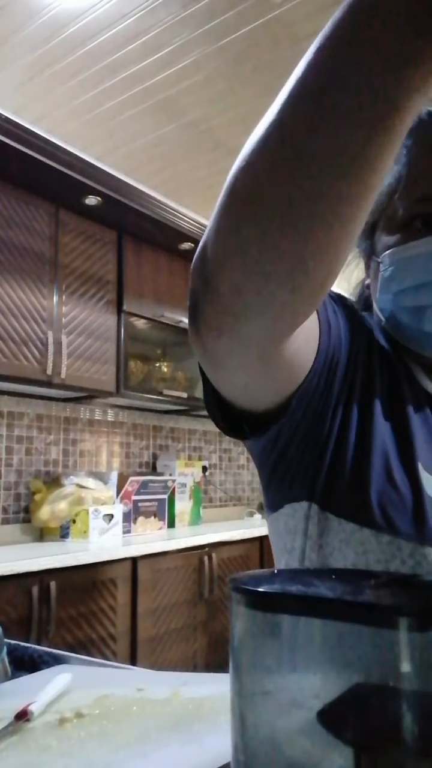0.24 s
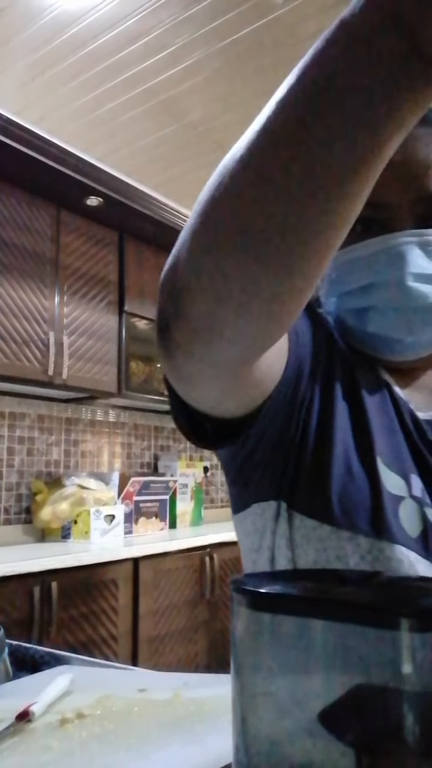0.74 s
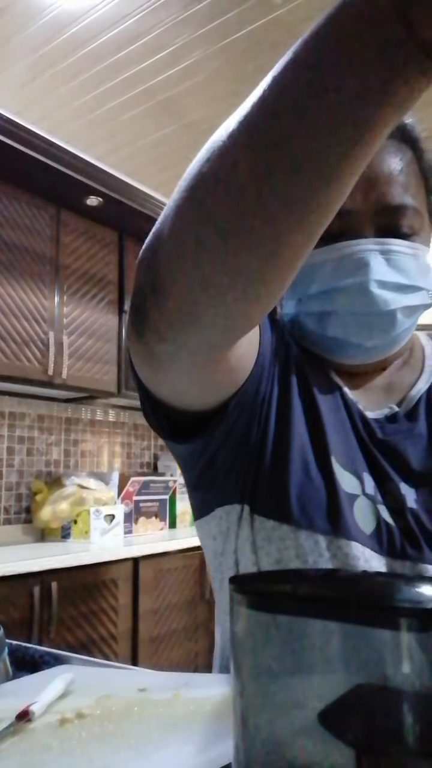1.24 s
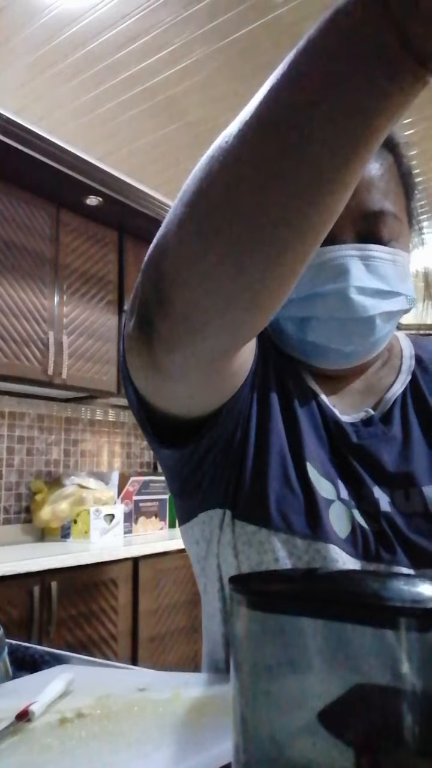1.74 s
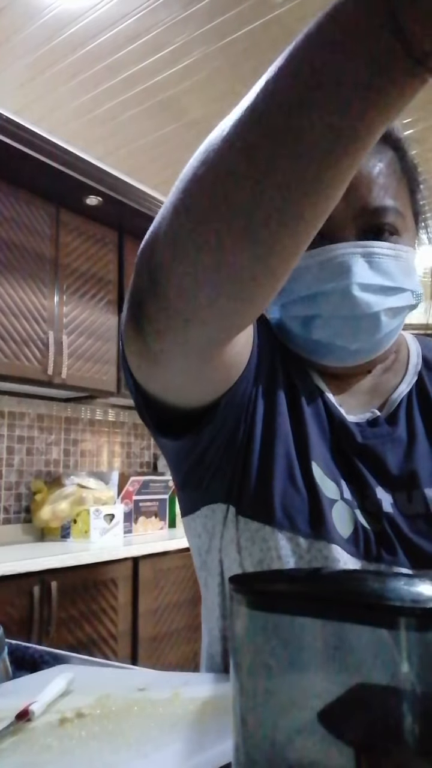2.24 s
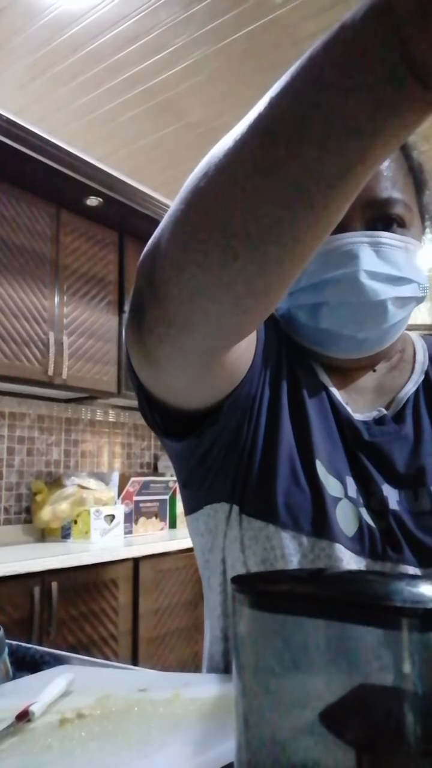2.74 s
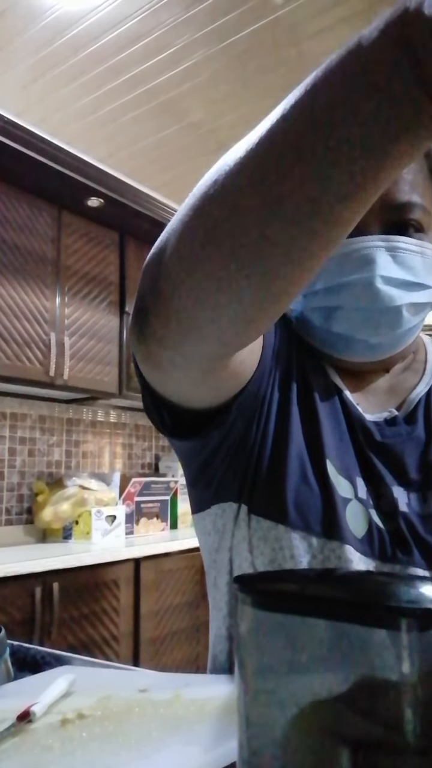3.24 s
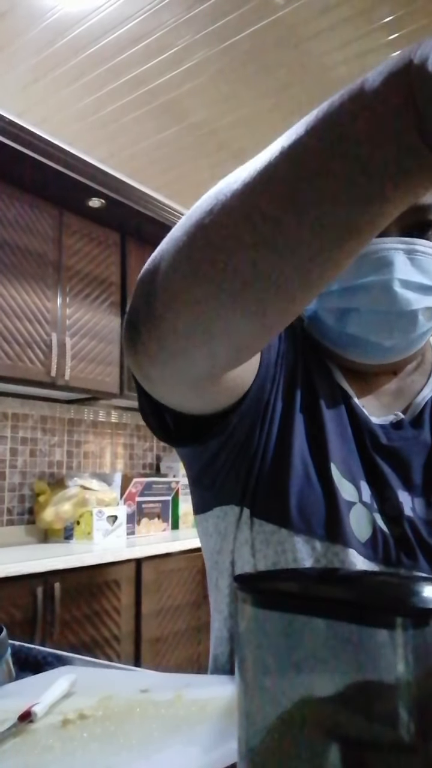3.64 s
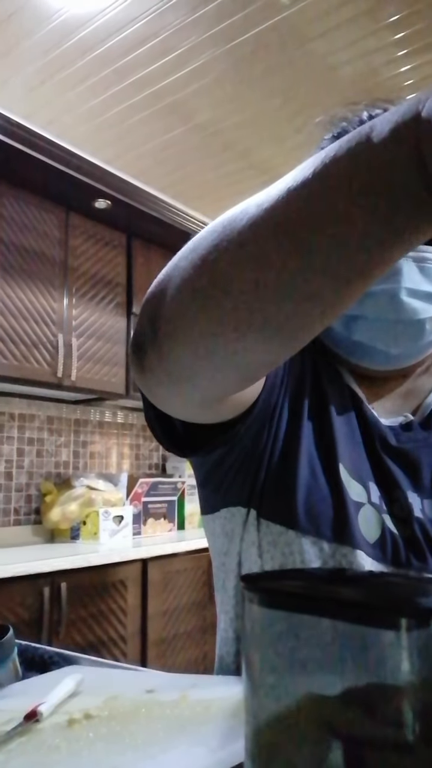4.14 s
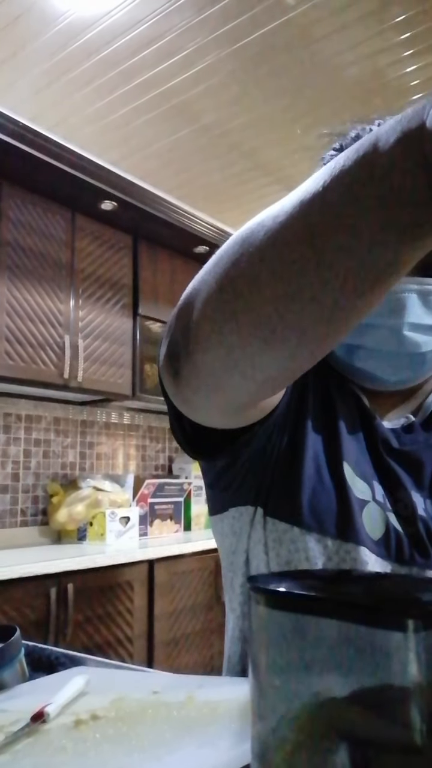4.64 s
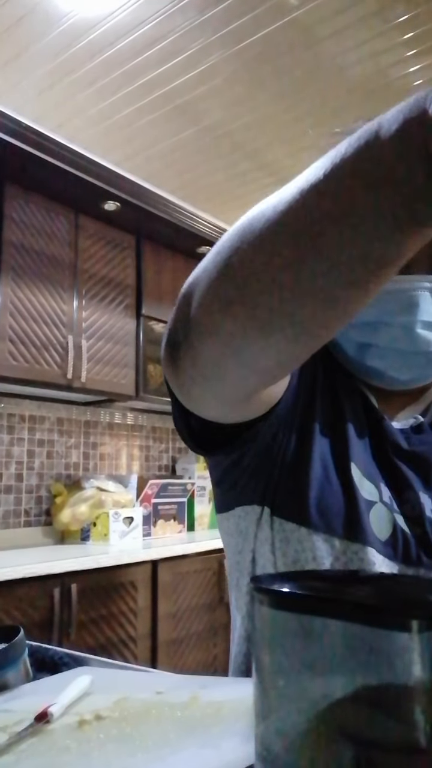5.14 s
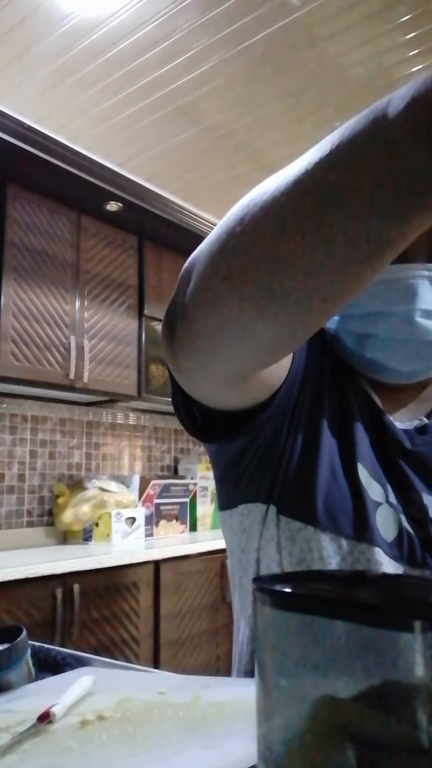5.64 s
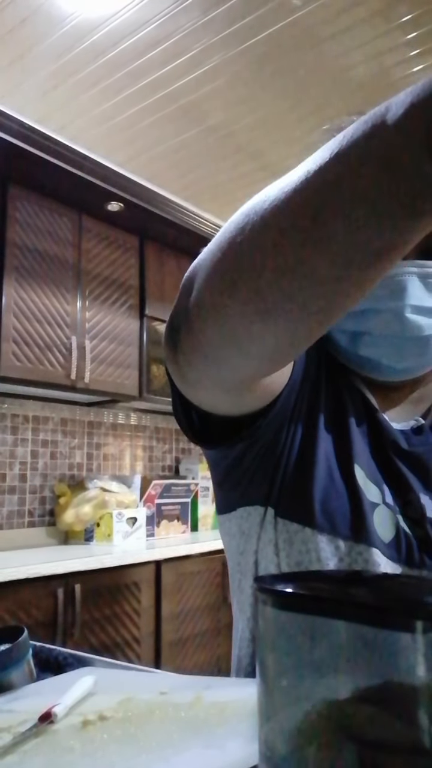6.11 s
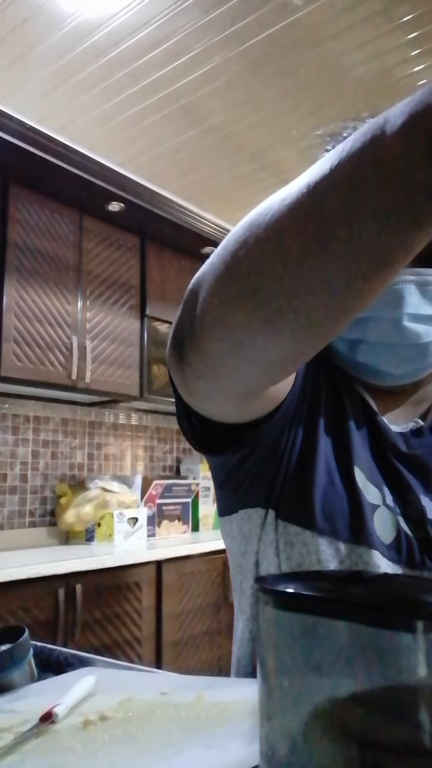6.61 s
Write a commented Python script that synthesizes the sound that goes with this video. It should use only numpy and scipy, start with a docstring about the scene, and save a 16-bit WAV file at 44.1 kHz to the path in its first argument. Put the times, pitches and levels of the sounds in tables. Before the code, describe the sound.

After a knock and plastic clicks, a juicer shreds produce in rough bursts, then spins freely with a climbing whine and rushing air.

```python
"""A kitchen hums. Plastic parts of an electric juicer click, and a knock rings its body.
The brushed mains motor starts, labouring and groaning while the disc shreds produce, lump by lump.
Then it runs free: the twelve-slot whine glides up through the housing's resonances
and settles over the rush of air from the emptied basket."""
import sys
import numpy as np
from scipy import signal
from scipy.fft import rfft, irfft, next_fast_len
from scipy.io import wavfile
from scipy.ndimage import map_coordinates

SR = 44100
rng = np.random.default_rng(int(sys.argv[2]) if len(sys.argv) > 2 else 0)


def dump_mix(stems):
    """Bounce the given channels to the path in sys.argv[1] as a 16-bit WAV at rate SR."""
    frames = np.atleast_2d(stems).T  # one column per channel
    limited = np.clip(frames, -1, 1)  # hard clip at full scale
    pcm = np.round(limited * 32767).astype(np.int16)
    wavfile.write(sys.argv[1], SR, pcm)


N = 302967
TIME_S = np.arange(N) / SR

# power shared by both ears (frequency [Hz], share [0-1])
COHERENCE = [(60, 0.87), (300, 1), (600, 0.99), (2000, 0.2), (6000, 0.067), (14000, 0.044)]

# kitchen background (time [s], noise level [dB], hum gain [dB])
ROOM_LEVELS = [(0, -45, 0.5), (0.8, -44.5, 0.5), (1.9, -45, 1.5), (1.96, -49, -4), (2.2, -45.5, 0),
               (2.36, -45.5, 0.5), (2.43, -50.5, -21), (4.2, -52, -11), (6.87, -71, -10.5)]
# hum tones (frequency [Hz], level [dB], wander [Hz])
ROOM_TONES = [(117.5, -59, 1.5), (118.8, -52.5, 3.35), (227.7, -44.5, 0.44), (414, -60, 3.8),
              (767, -55.5, 1.67)]
# room noise (frequency [Hz], relative density [dB])
ROOM_SPECTRUM = [(18, -54), (30, -13), (115, -12), (170, -5.5), (227, -15), (287, -11), (702, -12.5),
                 (760, -11.5), (1280, -21.5), (3060, -26), (4300, -34), (6720, -26.5), (8520, -40.5),
                 (14800, -46.5), (16000, -38)]
# room noise image (frequency [Hz], left-right [dB])
ROOM_PAN = [(60, -8), (110, 2), (200, -9), (380, -0.5), (700, -3), (1290, -2), (2380, -7.5), (4400, -7.5),
            (8120, -5), (15000, -10)]

# plastic parts, hard bits striking them (time [s], level [dB], T60 [s], left-right [dB], tilt [dB/oct])
CLICKS = [(0.183, -40, 0.0098, -12, 15), (0.309, -42, 0.051, -6, 12), (0.3727, -46, 0.056, -10, 17),
          (0.966, -43, 0.029, -5, 14), (1.9147, -38, 0.12, -12, 24), (1.93, -35.5, 0.041, -12, 5),
          (1.9406, -22.5, 0.026, -13, 17.5), (2.357, -38, 0.012, -9, 15), (2.375, -31.5, 0.039, -6, 12.5),
          (2.719, -21, 0.024, 7, 11), (2.847, -24, 0.018, -2, 12), (2.866, -34, 0.018, 2, 3),
          (3.231, -28, 0.017, -5, -8), (3.9, -25, .02, 2, 11), (3.936, -22.5, 0.021, -5, 7),
          (4.0755, -24.5, 0.041, -8, 11.5), (4.768, -28, 0.03, -2, 8), (4.846, -35, 0.035, 7, 12)]
# ring of the plastic (frequency [Hz], relative density [dB])
PLASTIC_SPECTRUM = [(700, 3), (1500, 6.5), (2400, 16), (3800, -2.5), (5300, 1.5), (7000, 0), (9000, -17.5),
                    (12000, -25), (15000, -25)]
# contacts on the body (time [s], level [dB], contact cut-off [Hz])
KNOCKS = [(0.3094, -20.5, 2950), (0.3142, -13, 840), (0.323, -26, 700), (0.346, -36, 1500),
          (0.357, -23, 550), (0.3695, -21, 800), (0.38, -20, 302)]
# body modes (frequency [Hz], gain [dB], T60 [s])
BODY_MODES = [(100, -9, 0.082), (190, -0.5, 0.039), (328, -12.5, 0.16), (528, 5, 0.082), (600, -11, 0.22),
              (943, 2.5, 0.04), (970, -9, 0.07), (1460, -7.5, 0.033), (2400, -6.5, 0.016)]

# start-up and labouring under load (time [s], shaft rate [Hz])
LOADED_SPEED = [(2.38, 5), (2.5, 30), (2.74, 49), (2.88, 66), (2.97, 71), (3.08, 79), (3.36, 76),
                (3.55, 80.5), (3.61, 72.5), (3.81, 81.5), (3.92, 74), (4.02, 72), (4.07, 76.4)]
# slot tone and overtones, in order (source level [dB])
SLOT_HARMONICS_DB = [-32.5, -37, -41, -49, -52, -54, -56]
# tones of uneven slots and bearings (order [x shaft rate], source level [dB])
SIDE_ORDERS = [(2, -38), (3, -41), (5, -57.5), (9, -53), (10, -50), (11, -46.5), (13, -41), (14, -51.5),
               (15, -59.5), (16, -60), (19, -61), (22, -51), (27, -53), (29, -61), (33, -63)]
# housing resonances (centre [Hz], width [Hz], gain [dB], left-right [dB])
HOUSING_PEAKS = [(1005, 120, 0, 6), (1193, 64, -11, 8), (1665, 87, -8, -17), (1920, 34, -4, -3),
                 (2052, 79, 0, 3), (2407, 220, -0.5, -17), (2582, 61, -5.5, -29), (3010, 106, 2, 3),
                 (5310, 310, -3.5, 9), (6300, 220, 10, -7), (6720, 150, 10.5, -7), (7095, 380, 1, 6),
                 (8200, 120, 0, -5), (9850, 590, -0.5, -5), (11850, 600, 3, -42), (13600, 400, 0, -14),
                 (14870, 250, 4, -23)]
# radiation between resonances (frequency [Hz], gain [dB])
HOUSING_FLOOR = [(300, -25), (750, -17.5), (1350, -17), (2700, -10), (3600, -12.5), (4900, -16.5),
                 (5600, -7), (9000, -10), (13500, -11)]
# cancellation of neighbouring resonances (centre [Hz], width [Hz], gain [dB])
HOUSING_NULLS = [(1115, 34, -11), (1520, 58, -12), (1790, 48, -1), (2150, 74, 0.5), (2810, 27, -20),
                 (4400, 96, -7), (6485, 46, -8), (10650, 250, -14)]

# course of the shredding (time [s], relative spray level [dB], relative rasp level [dB])
SHRED_LEVELS = [(2.39, -66, -72), (2.466, -46, -44.5), (2.576, -37, -37), (3.184, -33, -37),
                (3.246, -38, -42.5), (3.492, -33, -37), (3.656, -37.5, -38.5), (3.932, -34.5, -35.5),
                (4.028, -46.5, -46.5), (4.08, -34.5, -39), (4.094, -45, -54), (4.12, -50, -44)]
# lumps caught by the disc (time [s], length [s], rumble level [dB], thump level [dB])
LUMPS = [(2.399, 0.06, -38.5, -43), (2.453, 0.059, -32, -33.5), (2.515, .1, -36, -28),
         (2.661, 0.1, -30.5, -27), (2.77, 0.067, -34, -33.5), (2.974, 0.093, -29.5, -34.5),
         (3.135, 0.072, -34, -36), (3.33, 0.13, -41.5, -41), (3.473, 0.11, -34.5, -36),
         (3.624, 0.11, -38, -50), (3.837, 0.06, -30, -29), (3.928, 0.03, -23.5, -30.5),
         (4.048, 0.017, -27, -29.5)]
# lumps in the basket, low band (frequency [Hz], relative density [dB])
RUMBLE_SPECTRUM = [(35, -23), (55, -5.5), (75, -2.5), (115, -3), (145, -11), (175, -6.5), (230, -11.5),
                   (280, -24)]
# lumps in the basket, middle band (frequency [Hz], relative density [dB])
THUMP_SPECTRUM = [(270, -5.5), (350, 1), (430, 3), (480, -7), (540, -1.5), (650, -1), (770, -11), (940, -2),
                  (1100, -12.5), (1300, -10)]
# teeth tearing flesh (frequency [Hz], relative density [dB])
RASP_SPECTRUM = [(1150, 12.5), (1300, -0.5), (1550, 4.5), (1950, 4), (2500, 3.5), (3100, 4), (3700, -2),
                 (4400, -28)]
# pulp spraying the lid (frequency [Hz], relative density [dB])
SPRAY_SPECTRUM = [(2350, -51), (4000, -6), (4790, -6.5), (5220, 2), (5930, -3.5), (7060, 2.5), (7440, 1),
                  (8070, -10), (9120, -12), (10700, -15.5), (12000, -13), (13800, -17), (15000, -11.5),
                  (15500, -15), (16000, -27)]
# shredding image (frequency [Hz], left-right [dB])
SHRED_PAN = [(60, 0.5), (110, 2.5), (200, -1.5), (380, 0), (700, 2.5), (1290, 7.5), (2380, -1), (4400, 2.5),
             (8120, 2.5), (15000, -5.5)]
# motor groans as produce is pushed down (time [s], length [s], level [dB])
GROANS = [(2.5, 0.1, -33), (2.68, 0.092, -34), (2.93, 0.046, -33.5), (3.07, 0.073, -31.5),
          (3.245, .12, -33.5), (3.45, 0.054, -33), (3.6, .11, -29.5), (3.77, .11, -34.5)]

# air through the spout (frequency [Hz], relative density [dB])
RUSH_SPECTRUM = [(110, -20), (170, 2.5), (260, -5), (330, 6), (410, 7.5), (560, 0), (700, -11.5),
                 (800, -14.5), (950, -5.5), (1150, -1.5), (1330, -15), (1800, -20)]
# vent hiss (frequency [Hz], relative density [dB])
HISS_SPECTRUM = [(1500, -5), (2400, -1.5), (3200, -5.5), (3700, -8), (4400, -7.5), (5200, -1.5), (6300, 6),
                 (7300, 3), (8100, -7.5), (9000, -8.5), (10200, -8), (12000, -6.5), (14000, -8),
                 (15500, -5)]
# low buffeting (frequency [Hz], relative density [dB])
BUFFET_SPECTRUM = [(45, -4), (70, -9), (110, 7.5)]
# air image (frequency [Hz], left-right [dB])
AIR_PAN = [(200, -2), (500, -5), (800, -2), (1100, 9.5), (1600, -4.5), (3500, -3), (4700, 9), (6000, -4.5),
           (8000, 0), (10500, 1), (12000, -11), (15000, -19)]

MAINS_HZ, SLOTS = 60, 12
FREE_AT_S, TOP_SHAFT_HZ = 4.07, 221.14


def from_db(db):
    """Decibels to gain."""
    return 10 ** (np.asarray(db) / 20)


def unit_rms(x):
    """Scale to unit power."""
    return x / np.sqrt(np.mean(x ** 2) + 1e-20)


def decay(age_s, t60_s):
    """Exponential fall, 60 dB in t60_s."""
    return np.exp(-np.log(1000) * age_s / t60_s)


def in_time(rows):
    """Columns of a time table at every sample."""
    times_s, *columns = np.transpose(rows)
    return [np.interp(TIME_S, times_s, column) for column in columns]


def at_hz(points, hz):
    """Read a curve on a log-frequency axis."""
    knots_hz, values = np.transpose(points)
    return np.interp(np.log(hz), np.log(knots_hz), values)


def cutting(fade_s):
    """One while the disc shreds, fading to zero outside."""
    start_s, end_s = SHRED_LEVELS[0][0], SHRED_LEVELS[-1][0]
    return np.interp(TIME_S, [start_s - fade_s, start_s, end_s, end_s + fade_s], [0, 1, 1, 0])


def swells(rows, attack_s, release_s):
    """Gain of events (time [s], length [s], level [dB]) that rise, hold and die; powers add."""
    power = 0
    for start_s, length_s, db in rows:
        rise = np.clip((TIME_S - start_s) / attack_s, 0, 1)
        fall = np.exp(-np.clip((TIME_S - start_s - length_s) / release_s, 0, 30))
        power = power + (from_db(db) * rise * fall) ** 2
    return np.sqrt(power)


def drift(rate_hz):
    """Smooth random curve, unit rms."""
    knots = rng.standard_normal(int(2 * rate_hz * N / SR) + 4)
    return unit_rms(map_coordinates(knots, [TIME_S * 2 * rate_hz], order=2))


def panned(db):
    """Constant-power left and right gains."""
    gains = from_db(np.array([[.5], [-.5]]) * db)
    return gains / np.sqrt(np.mean(gains ** 2, axis=0))


def coloured(noises, spectrum, pan, left_lag_s):
    """One shared and two per-ear noises to shaped stereo, unit rms."""
    size = noises.shape[1]
    hz = np.maximum(np.fft.rfftfreq(size, 1 / SR), 1)
    parts = rfft(noises)
    shared = np.clip(at_hz(COHERENCE, hz), 0, 1)
    ears = np.sqrt(shared) * parts[0] + np.sqrt(1 - shared) * parts[1:]
    ears[0] *= np.exp(-2j * np.pi * hz * left_lag_s)
    skirts = 1 / np.sqrt((1 + (spectrum[0][0] / hz) ** 8) * (1 + (hz / spectrum[-1][0]) ** 12))
    return unit_rms(irfft(ears * from_db(at_hz(spectrum, hz)) * skirts * panned(at_hz(pan, hz)), size))


def stream(force, spectrum, pan, left_lag_s=0.0004504):
    """Turbulence or tearing: force-modulated stereo noise, unit rms."""
    noises = np.zeros((3, next_fast_len(N + 1, real=True)))
    noises[:, :N] = rng.standard_normal((3, N)) * force
    return coloured(noises, spectrum, pan, left_lag_s)[:, :N]


def room_hum():
    """Fan-like hum and hiss, both lower once the juicer runs."""
    noise_db, hum_db = in_time(ROOM_LEVELS)
    tones = 0
    for hz, db, wander_hz in ROOM_TONES:
        gain = np.sqrt(2) * from_db(hum_db + db + 1.13 * drift(6.18))
        phase_rad = 2 * np.pi * np.cumsum(hz + wander_hz * drift(8)) / SR
        tones += gain * np.sin(phase_rad)
    noise = from_db(noise_db) * stream(1, ROOM_SPECTRUM, ROOM_PAN, left_lag_s=0.00035)
    return noise + tones * panned(-1.3)


def clicks():
    """Cracks that die quickly in the dense modes of the plastic."""
    out, age_s = np.zeros((2, N)), TIME_S[:8192]
    for start_s, db, t60_s, pan_db, tilt_db_per_oct in CLICKS:
        spectrum = [(hz, level_db + tilt_db_per_oct * np.log2(hz)) for hz, level_db in PLASTIC_SPECTRUM]
        crack = coloured(rng.standard_normal((3, len(age_s))), spectrum, [(1, pan_db)], left_lag_s=0)
        start = int(start_s * SR)
        out[:, start:start + len(age_s)] += from_db(db) * crack * decay(age_s, t60_s)
    return out


def kitchen_reverb(x, t60_s=0.37):
    """Tiles and cupboards return a short diffuse tail, different at each ear."""
    age_s = TIME_S[:SR // 2]
    tail = rng.standard_normal((2, len(age_s))) * decay(age_s, t60_s) * (age_s > .004)
    return signal.fftconvolve(x, tail / np.sqrt(np.sum(tail ** 2) / 2), axes=1)[:, :N]


def knocks():
    """A heavy piece lands and rocks; soft contacts ring only the low body modes."""
    out, age_s = np.zeros(N), TIME_S[:SR // 4]
    for hz, mode_db, t60_s in BODY_MODES:
        for start_s, db, contact_hz in KNOCKS:
            start = int(start_s * SR)
            gain = from_db(db + mode_db) / (1 + (hz / contact_hz) ** 2)
            envelope = (1 - np.exp(-age_s * contact_hz)) * decay(age_s, t60_s)
            out[start:start + len(age_s)] += gain * envelope * np.sin(2 * np.pi * hz * age_s)
    low_cut = signal.butter(2, 90, "high", fs=SR, output="sos")   # the knocks are thinned below about 90 Hz
    return signal.sosfilt(low_cut, out) * panned(-11.5)


def shaft_rate_hz(quick_share=.377, quick_s=.316, slow_s=.929):
    """Held down by the load; once free, nears top speed quickly, then slowly."""
    loaded_hz, = in_time(LOADED_SPEED)
    free_s = np.maximum(TIME_S - FREE_AT_S, 0)
    gap = quick_share * np.exp(-free_s / quick_s) + (1 - quick_share) * np.exp(-free_s / slow_s)
    return TOP_SHAFT_HZ - (TOP_SHAFT_HZ - loaded_hz) * gap


def shaft_angle_rad(shaft_hz, wobble=.0003, load_wobble=.016):
    """The shaft turns evenly when free, unsteadily while cutting."""
    unsteady = wobble * drift(14) + load_wobble * cutting(fade_s=0.091) * drift(35)
    return 2 * np.pi * np.cumsum(shaft_hz * (1 + unsteady)) / SR


def housing(hz):
    """Stereo gain of a gliding tone: swells at resonances, drops where they cancel."""
    grid_hz = np.arange(10, SR / 2, 10)
    power = from_db(at_hz(HOUSING_FLOOR, grid_hz)) ** 2
    for centre_hz, width_hz, db, pan_db in HOUSING_PEAKS:
        peak = from_db(db) / (1 + 2 * ((grid_hz - centre_hz) / width_hz) ** 2)
        power = power + (peak * panned(pan_db)) ** 2
    nulls_db = sum(db * np.exp(-((grid_hz - centre_hz) / width_hz) ** 2)
                   for centre_hz, width_hz, db in HOUSING_NULLS)
    return np.array([np.interp(hz, grid_hz, ear) for ear in np.sqrt(power) * from_db(nulls_db)])


def motor(shaft_hz, shaft_rad, full_hum_hz=107, full_whine_hz=65, shake_hz=116, shake_width_hz=5):
    """Imbalance hums once a turn; the slots whine, throbbing with each mains half wave."""
    pulse_rad = 2 * np.pi * 2 * MAINS_HZ * TIME_S
    pulse = np.cos(pulse_rad)
    torque = np.cos(pulse_rad + np.pi / 5)   # out of step with the throb: unequal sidebands

    def tone(order, db, throb, sway_rad):
        """One multiple of the shaft rate; pulsing torque sways its phase."""
        ears_rad = min(order * 0.2, 1.5) * np.array([[-.5], [.5]])   # short waves arrive out of step
        wave = np.sin(order * shaft_rad + ears_rad + sway_rad * torque + rng.uniform(0, 2 * np.pi))
        return np.sqrt(2) * from_db(db) * (1 + throb * pulse) * wave

    shake_db = 5 / (1 + ((shaft_hz - shake_hz) / shake_width_hz) ** 2)   # machine shakes on its feet
    hum = tone(1, db=-42.5 + shake_db + .5 * drift(11), throb=.04, sway_rad=0) * panned(-4.0)
    hum *= np.minimum(shaft_hz / full_hum_hz, 1) ** 2
    slot_db = SLOT_HARMONICS_DB[0] + 0.87 * drift(11)
    whine = housing(SLOTS * shaft_hz) * tone(SLOTS, slot_db, throb=0.47, sway_rad=0.38)
    for harmonic, db in enumerate(SLOT_HARMONICS_DB[1:], 2):
        order = harmonic * SLOTS
        whine += housing(order * shaft_hz) * tone(order, db + 1.33 * drift(30), throb=0.23, sway_rad=0.65)
    for order, db in SIDE_ORDERS:
        whine += housing(order * shaft_hz) * tone(order, db, throb=0.26, sway_rad=0.23)
    whine += from_db(-53) * pulse
    whine *= np.minimum(shaft_hz / full_whine_hz, 1) ** 2
    whine *= from_db(-8 * cutting(fade_s=.04))
    running = TIME_S > LOADED_SPEED[0][0]
    return running * (hum + whine)


def tears(rate_hz, spread_db, length_s, share):
    """Force of fibres snapping in short random bursts over a steady scrape."""
    sizes = from_db(spread_db * np.minimum(rng.exponential(1, N), 4))
    snaps = sizes * (rng.random(N) < rate_hz / SR)
    power = signal.lfilter([1], [1, -np.exp(-1 / (length_s * SR))], snaps ** 2 + 1e-18)
    return np.sqrt(1 - share + share * power / power.mean())


def shredding(shaft_rad, bite_depth=0.069, attack_s=0.0088, release_s=0.032):
    """Teeth tear the flesh harder once a turn; pulp thumps the basket and sprays the lid."""
    spray_db, rasp_db = in_time(SHRED_LEVELS)
    rumble = swells([(at_s, length_s, db) for at_s, length_s, db, _ in LUMPS], attack_s, release_s)
    thump = swells([(at_s, length_s, db) for at_s, length_s, _, db in LUMPS], attack_s, release_s)
    rumble = np.hypot(rumble, from_db(rasp_db - 11))   # between lumps both follow the rasp
    thump = np.hypot(thump, from_db(rasp_db - 1))
    bite = 1 + bite_depth * np.cos(shaft_rad)
    chunks = bite * tears(rate_hz=220, spread_db=1.0, length_s=0.0018, share=0.42)
    fibres = bite * tears(rate_hz=870, spread_db=2.0, length_s=0.0027, share=0.75)
    out = rumble * stream(chunks, RUMBLE_SPECTRUM, SHRED_PAN, left_lag_s=0.00053)
    out += thump * stream(chunks, THUMP_SPECTRUM, SHRED_PAN, left_lag_s=0.00028)
    out += from_db(rasp_db + 2.5) * stream(fibres, RASP_SPECTRUM, SHRED_PAN)
    out += from_db(spray_db + 3.5) * stream(fibres, SPRAY_SPECTRUM, SHRED_PAN)
    return out * cutting(fade_s=0.034)


def groan(shaft_rad, rough_db=3.0, left_lag_s=.0002):
    """The slot tone surges and judders as produce is pushed onto the disc."""
    ears_rad = np.array([np.interp(TIME_S - left_lag_s, TIME_S, shaft_rad), shaft_rad])
    gain = np.sqrt(2) * swells(GROANS, attack_s=0.0088, release_s=.025) * from_db(rough_db * drift(45))
    judder_rad = .75 * drift(60) + .45 * np.sin(shaft_rad)
    slot_rad = SLOTS * ears_rad + judder_rad
    wave = np.sin(slot_rad) + from_db(-14.5) * np.sin(2 * slot_rad) + from_db(-15) * np.sin(3 * slot_rad)
    return gain * panned(12) * wave


def air(shaft_hz, shaft_rad, rush_db_per_oct=12, hiss_db_per_oct=7.5):
    """The emptied basket fans air through the spout; vent hiss is chopped once a turn."""
    speed_oct = np.log2(shaft_hz / TOP_SHAFT_HZ)
    rush = stream(1, RUSH_SPECTRUM, AIR_PAN, left_lag_s=0.00031)
    rush *= from_db(-40.5 + rush_db_per_oct * speed_oct)
    hiss = stream(1 + 0.1 * np.cos(shaft_rad), HISS_SPECTRUM, AIR_PAN)
    hiss *= from_db(-36.5 + hiss_db_per_oct * speed_oct)
    puff = swells([(5.2, .2, -53)], attack_s=0.16, release_s=0.17)
    buffet = (from_db(-65) + puff) * stream(1, BUFFET_SPECTRUM, AIR_PAN)
    fade_in = np.clip((TIME_S - FREE_AT_S) / .05, 0, 1)
    return (rush + hiss + buffet) * fade_in


def scene():
    """The juicer close by, in its kitchen."""
    shaft_hz = shaft_rate_hz()
    shaft_rad = shaft_angle_rad(shaft_hz)
    drive = motor(shaft_hz, shaft_rad) + groan(shaft_rad)
    hits = knocks() + clicks()
    reverb = kitchen_reverb(from_db(-15.5) * hits + from_db(-15) * drive)
    return hits + reverb + drive + shredding(shaft_rad) + air(shaft_hz, shaft_rad) + room_hum()


def record(dry, low_cut_hz=35, high_cut_hz=15850):
    """The microphone thins the lowest bass; the top is cut steeply."""
    thinned = signal.sosfilt(signal.butter(2, low_cut_hz, "high", fs=SR, output="sos"), dry)
    return signal.sosfiltfilt(signal.ellip(10, .1, 70, high_cut_hz, fs=SR, output="sos"), thinned)


dry = scene()
out = record(dry)
dump_mix(out)
```